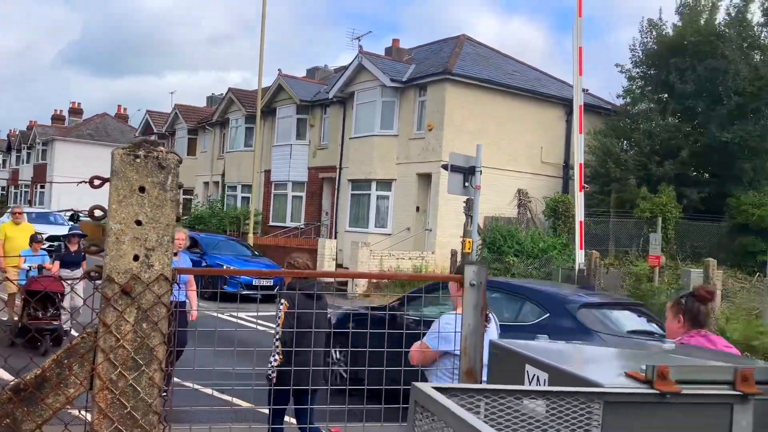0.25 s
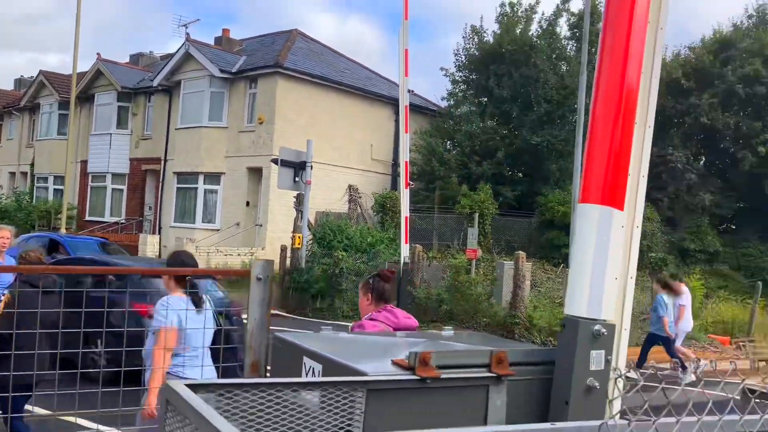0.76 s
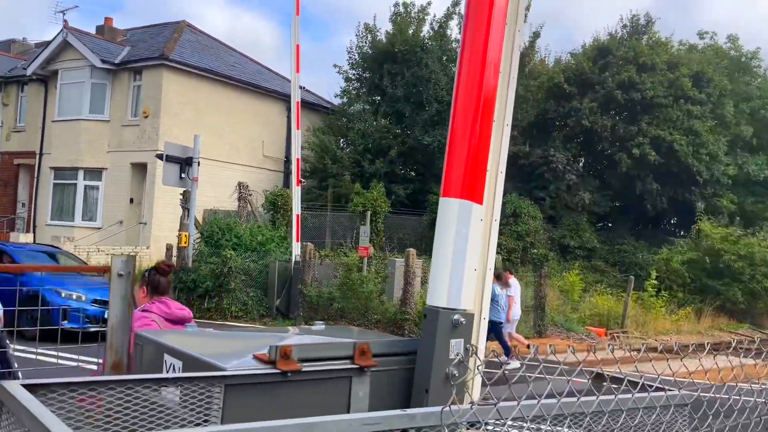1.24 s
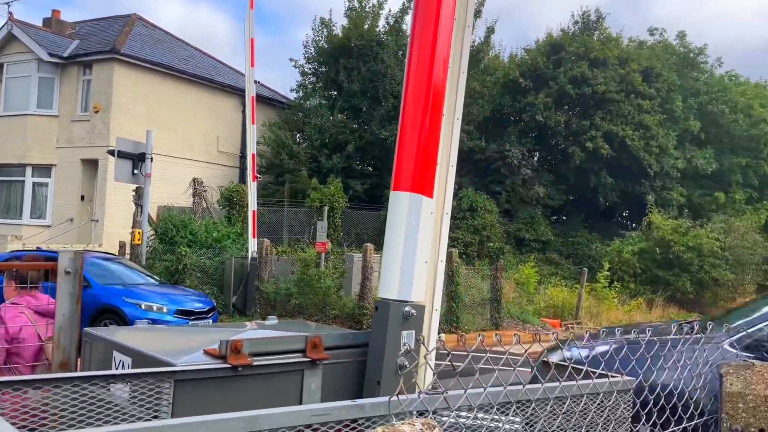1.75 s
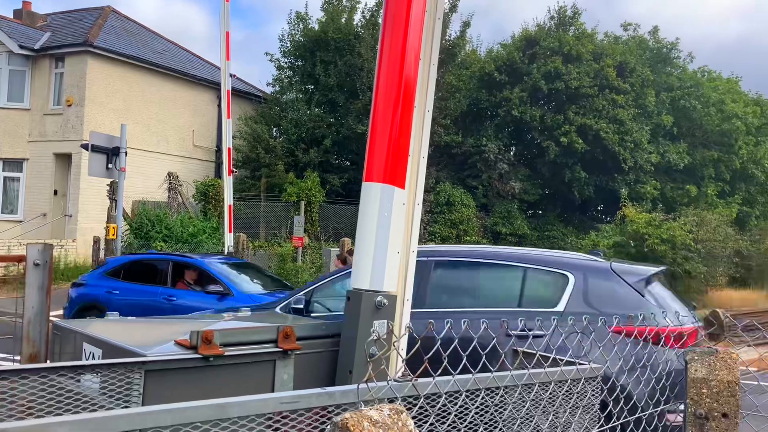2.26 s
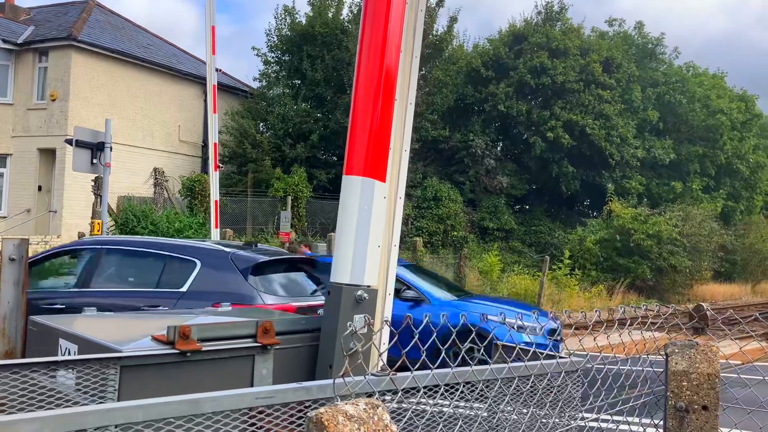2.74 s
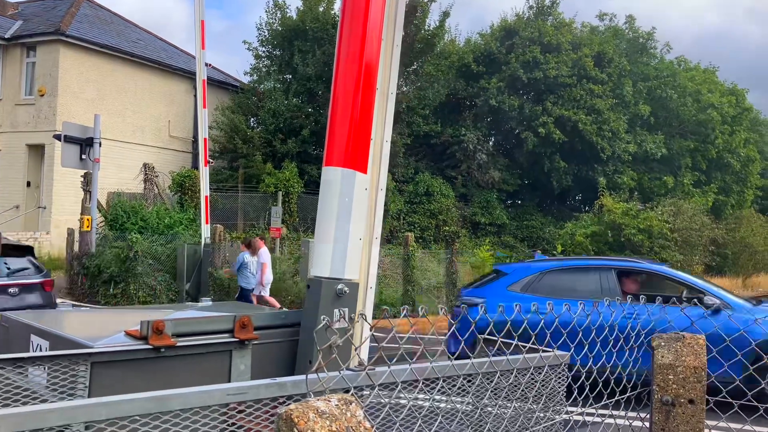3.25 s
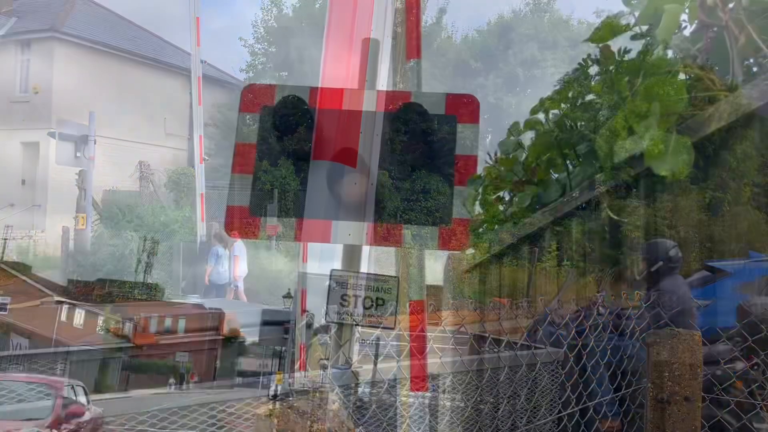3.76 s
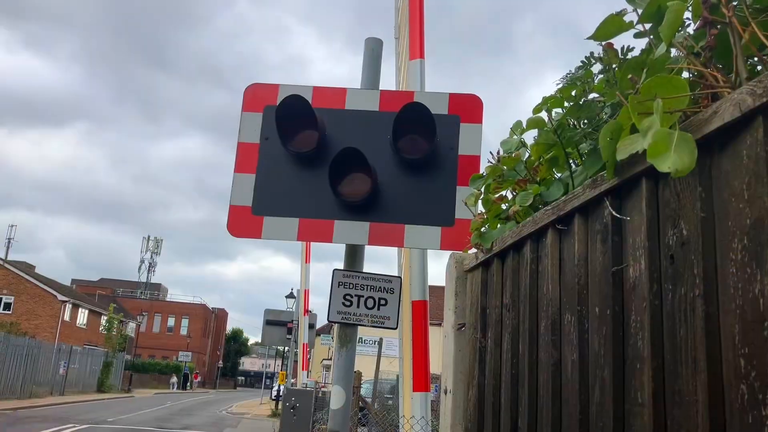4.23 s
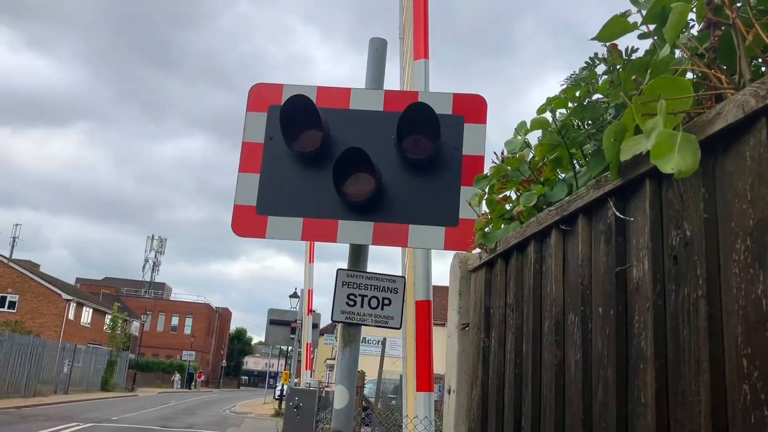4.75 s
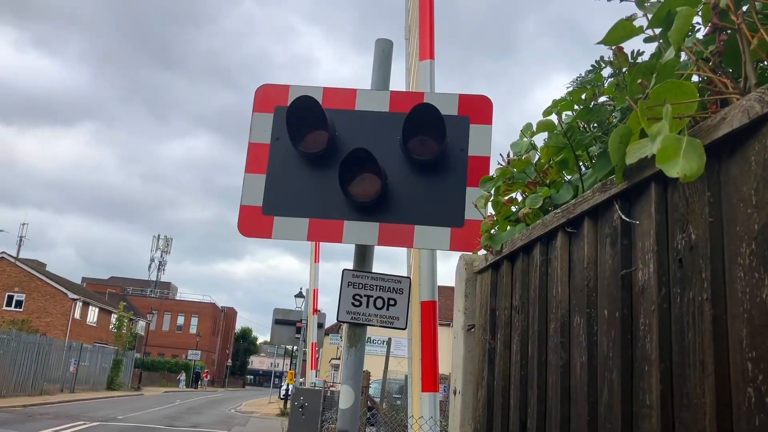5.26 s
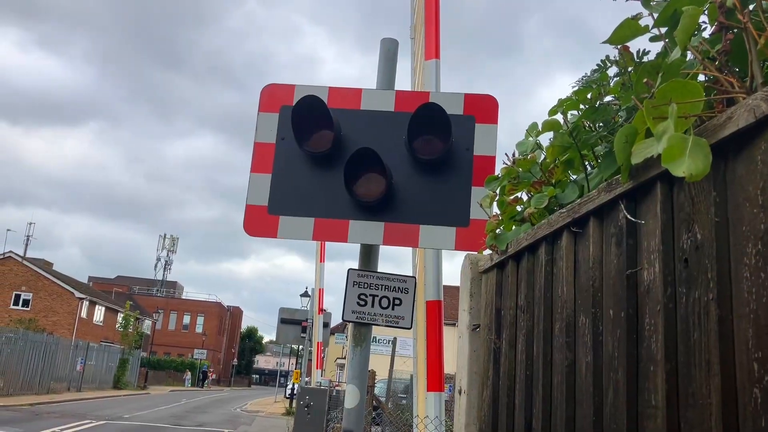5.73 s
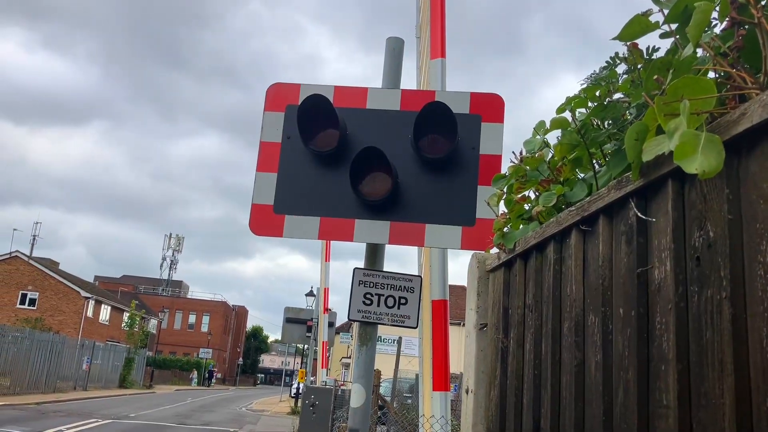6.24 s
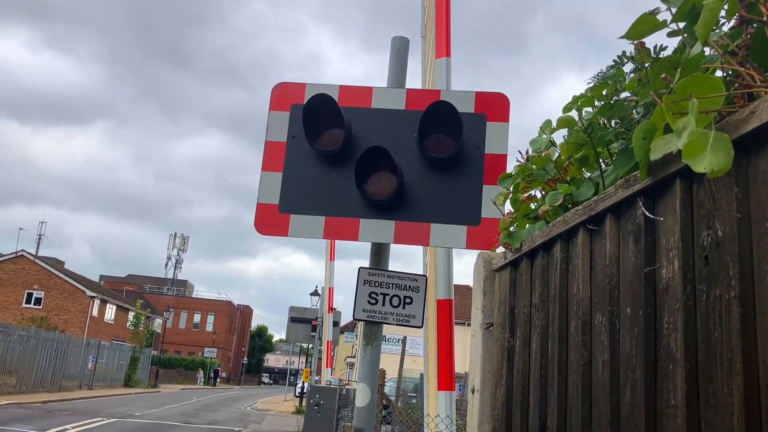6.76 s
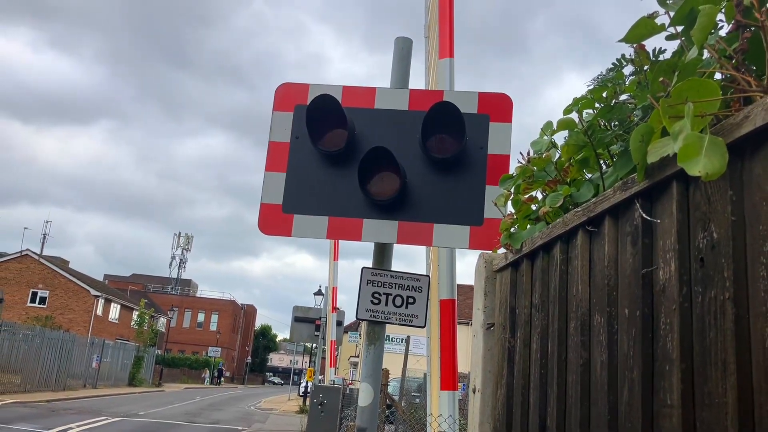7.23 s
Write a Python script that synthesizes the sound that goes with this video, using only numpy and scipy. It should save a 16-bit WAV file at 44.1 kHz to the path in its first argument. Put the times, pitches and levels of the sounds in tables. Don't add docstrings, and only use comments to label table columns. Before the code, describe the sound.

Outdoor stereo sound from two microphones close together. From 0 s, a fairly quiet, low traffic rumble: an engine coasts, its hum sinking until about 1 s, then pulling gently. A double tyre thump lands near 0.2 s, with faint very high brake chirps and small grit ticks. A second engine joins around 1.5 s; thumps come again near 2.1 s, bumps and chirps follow to 2.9 s, and a thin airy whistle grows towards 3.2 s. There the scene changes to a street: brighter tyre noise builds with slaps and crackling grit, and heavy thumps at 3.7 and 4.1 s. From 4.3 to 5.1 s a car passes very close, a broad roar with tread whine and exhaust note sliding down and a hollow boom off a fence. After 5.2 s it recedes through soft bumps, fading to dull distant traffic by 7.5 s.

```python
import sys
import numpy as np
from scipy import signal
from scipy.io import wavfile
from scipy.ndimage import uniform_filter1d

SR = 44100
rng = np.random.default_rng(int(sys.argv[2]) if len(sys.argv) > 2 else 0)


def rack_gain(trim_db):
    fader = np.asarray(trim_db, float)
    return 10 ** (fader / 20)


def store_wav(level_fs):
    pcm = np.round(np.clip(np.atleast_2d(level_fs), -1, 1) * 32767)
    wavfile.write(sys.argv[1], SR, pcm.T.astype(np.int16))


N = 330309

BAND_EDGES_HZ = (35, 200, 700, 2500, 8000)
SPREAD_DB = (4.64, 4.95, 12.23, 8.6)
# pitch_hz, level_db per Hz
QUEUE_COLOUR = [(18, -44), (30, -17), (45, -8.5), (76, -10.5), (177, -17), (214, -11), (484, -19),
                (680, -29.5), (960, -24), (1230, -34), (1880, -38.5), (2320, -49), (8000, -62),
                (10400, -80), (17600, -120)]
NEARING_COLOUR = [(18, -36), (30, 9), (63, 5.5), (235, -4), (290, -2.5), (325, -8), (520, -14),
                  (700, -20.5), (960, -8), (1320, -18), (1600, -15.5), (1970, -18.5), (2350, -26.5),
                  (3000, -31.5), (4570, -36.5), (8000, -41), (10400, -74), (17600, -120)]
PASSING_COLOUR = [(18, -30), (30, 4), (59, -6), (240, -4.5), (311, -12.5), (507, -12), (773, -11.5),
                  (1200, -7), (1490, -11), (2260, -16), (3970, -32.5), (5010, -32.5), (8000, -42.5),
                  (10400, -77), (17600, -120)]
LEAVING_COLOUR = [(18, -38), (30, -37), (44, -1), (114, -9), (158, -5.5), (318, -10), (544, -17),
                  (660, -22.5), (790, -19), (1000, -12), (1250, -13), (1790, -19), (2200, -26), (2550, -36),
                  (3300, -44.5), (4700, -50), (8000, -61)]
# pitch_hz, level_db against 7.5 kHz
QUEUE_AIR = [(10500, -6), (13000, -10), (16000, -15)]
PASSING_AIR = [(10500, -8), (13000, -11.5), (16000, -14)]
LEAVING_AIR = [(10500, -13), (13000, -19), (16000, -17)]
# level_db at nearness 0, then gain_db per dB of nearness
QUEUE_LAYERS = (-29, -37, -39.5, -51), (1.2, 1.8, 0, 0.9)
NEARING_LAYERS = (-27.5, -27, -38, -46.5), (-0.4, -0.32, 0.42, -.5)
PASSING_LAYERS = (-24, -29.5, -34.5, -43), (0.7, 2.2, 1.5, 0.96)
LEAVING_LAYERS = (-32.5, -34.5, -39, -53), (0.75, 0.82, 0.88, 1)
# time_s, nearness_db
QUEUE = [(0, 0.5), (.3, 1.5), (1.0, 0), (1.65, 0), (1.85, 0.5), (2.4, 2), (3.1, 4), (3.22, 2.5)]
NEARING = [(3.2, -7), (3.35, -6.5), (3.6, -2), (3.85, 2), (4.1, 2.5), (4.35, 8)]
PASSING = [(4.2, 0.5), (4.35, 1), (4.55, 0), (4.75, 0.5), (4.85, -1.5), (5.18, -3), (5.3, -7), (5.5, -3)]
LEAVING = [(5.15, 8), (5.35, 1.5), (5.6, 0), (5.9, -2), (6.1, -3), (6.5, -6), (7.05, -8.5), (7.49, -10)]
# start_s, end_s
HANDOVERS = [
    (3.22, 3.235),
    (4.23, 4.38),
    (5.12, 5.36),
]
# time_s, left_lag_samples, share of the sound (0-1)
SIDES = [(0, 15, 0.47), (.5, 14.5, 0.55), (1.75, 15, 0.4), (3.15, 12.5, 0.45), (3.5, 2, 0.09),
         (4.05, -9.5, 0.34), (5.1, -15.5, 0.33), (5.6, -18, 0.4), (7.49, -11.5, 0.31)]
# time_s, left_minus_right_db
LEAN = [(0, -0.5), (3.5, 1), (4.1, 0), (4.7, -0.1), (5.2, -1.5), (5.8, -1), (7.49, -1)]
# pitch_hz, left_minus_right_db
BASS_LEAN = [(60, 1), (140, -2.5), (280, -0.6), (1000, -0.5)]
# pitch_hz, then level_db on the left-right difference before and after the car
WIDENING = [(60, -4, -11), (130, 0, -6), (270, 2, 10), (600, 4, 6.5), (1150, -3, -2), (2110, 0.5, 2.5),
            (3500, -0.5, 0), (7000, -1, -0.5)]
# time_s, swing_db
THROB_DB = [(0, .5), (4.1, .5), (4.4, 2.5), (5.1, .4), (7.49, -0.3)]

# time_s, pitch_hz, level_db
FAR_CARS = [
    [(3.5, 72.5, -32), (3.65, 80, -29.5), (3.9, 97.7, -35)],
    [(5.9, 87.4, -45), (6.1, 95.3, -46), (6.3, 116.6, -43)],
]
# start_s, level_db (peak), pan_db, pitch_hz,
# decay_s
STRIKES = [(0.5694, -37, 0, 7540, 0.0028), (.5690, -43, 0, 12500, .004), (1.5873, -47, 1, 13480, .015),
           (1.742, -56, 0, 12020, 0.0036), (.3366, -44, 0, 11500, .006), (.8011, -47, 0, 11000, .004),
           (3.1762, -46, 0, 12000, .006), (3.8092, -48, 0, 12000, 0.0036), (.800, -40, -4, 6000, .003),
           (1.599, -42, 4, 9280, 0.0084), (2.41, -51, 0, 8850, 0.007), (2.463, -53, 0, 9380, 0.0071),
           (2.74, -46, -7, 10400, 0.0048), (2.79, -45, 0, 8420, 0.016), (3.301, -31.5, -8, 8150, 0.0022),
           (3.5345, -37, -6, 7500, 0.0035), (3.698, -35, -4, 4880, 0.0026), (3.710, -20, -2, 1550, 0.0038),
           (3.709, -32, -2, 4500, 0.0033), (3.739, -35, 0, 3800, 0.0018), (3.782, -36, 9, 7500, 0.0028),
           (3.81, -32.5, 13, 6500, 0.0029), (3.973, -28, 0, 4500, 0.0034), (3.987, -34, 4, 4500, .004),
           (4.023, -37, -10, 7000, .005), (4.060, -33, 0, 3980, .004), (4.304, -27, 9, 1400, 0.011),
           (4.378, -20, 11, 1670, .008), (4.658, -18, 7, 1480, 0.011), (5.036, -42, -1, 5900, 0.022),
           (2.77, -46, 0, 8000, 0.054), (3.785, -45, -3, 7940, .02),
           (.03, -33, 0, 1200, .012), (.33, -35, 4, 1150, .012), (.47, -33, 0, 1150, 0.011),
         (.73, -29.5, -3, 1200, 0.013), (3.242, -25, 0, 1250, 0.0078), (3.31, -23, 4, 1350, .008),
         (3.511, -27, 1, 1200, 0.0073), (3.649, -27, 7, 1210, 0.0096), (3.671, -32, 0, 1252, .008),
         (3.929, -28, 0, 1100, .008), (4.03, -25, 6, 1350, .015), (4.076, -31, 1, 1150, 0.014),
         (3.69, -30.5, -2, 1970, 0.017), (3.38, -31, 0, 2000, .015), (4.185, -24, 0, 1150, 0.011),
         (4.282, -29, 1, 1100, .01), (4.415, -26, 4, 1150, 0.011), (4.55, -29.5, -2, 3000, 0.017),
         (4.577, -26, 3, 1500, .01), (4.746, -16, 2, 1450, 0.011), (5.045, -23, -2, 1210, 0.011),
         (5.086, -28, -2, 1150, 0.0094), (5.375, -24, 0, 1150, .012)]
# start_s, level_db (peak), pitch_hz
CHIRPS = [(0.1101, -47.5, 11600), (0.3696, -54, 11500), (0.598, -52, 11600), (1.1623, -52, 11640),
          (1.4345, -48, 11600), (1.4805, -52, 11470), (1.7416, -44, 11570), (2.2987, -53, 11520),
          (2.3396, -45, 11580), (2.586, -40, 11600), (2.8245, -42, 11630), (2.913, -52, 11570)]
# start_s, level_db (peak), pitch_hz
THUMPS = [(0.2145, -20, 259), (0.2255, -12, 414), (.68, -20.5, 304), (1.55, -19, 258), (2.093, -12, 270),
          (2.139, -15, 202), (3.2298, -18, 294), (3.708, -10, 228), (4.064, -11.5, 286), (4.32, -18, 254),
          (4.382, -17, 326),
          (.109, -26, 229), (.375, -26, 230), (0.513, -23, 290), (.665, -21, 423), (.76, -21, 462),
         (.878, -19.5, 230), (4.482, -13, 149), (4.47, -24, 620), (4.61, -19, 497), (4.66, -19, 500),
         (4.765, -20, 180), (1.434, -24, 217), (1.67, -27, 170), (2.579, -15, 195), (2.696, -17, 215),
         (2.776, -15, 202), (2.992, -20, 180.5), (3.31, -19, 249), (3.418, -22, 230), (3.496, -21, 218),
         (3.981, -14, 171), (4.046, -16, 300), (4.072, -13, 260), (4.086, -14.5, 240), (4.188, -21, 250),
         (5.104, -18, 149), (5.15, -21, 175), (5.253, -13.5, 221), (5.35, -26, 183), (5.476, -16, 259),
         (5.507, -18.5, 250), (5.608, -17.5, 198), (5.771, -22, 250), (6.02, -25, 300), (6.274, -27, 215)]

# time_s, pitch_hz, level_db
BELT = [(0, 5900, -63), (.3, 5900, -71), (.55, 5900, -59), (.75, 5860, -64), (1.3, 5850, -78),
        (1.6, 5913, -80)]
# time_s, pitch_hz, level_db
TURBINE = [(2.6, 4200, -71), (2.8, 4300, -59), (3.0, 4430, -53.5), (3.25, 4500, -48), (3.4, 4300, -51),
           (3.6, 4300, -56), (3.75, 4200, -66)]
# time_s, pitch_hz, level_db
INTAKE = [(2.3, 3500, -62), (2.55, 3500, -58), (2.8, 3193, -52.5), (3.05, 3300, -52), (3.2, 3292, -58),
          (3.45, 3290, -53), (3.62, 3394, -55), (3.72, 3400, -68)]
# time_s, pitch_hz, level_db
PANELS = [(3.224, 1695, -59.5), (3.231, 1690, -37), (3.45, 1610, -40), (3.72, 1530, -40), (3.85, 1450, -58)]
# time_s, pitch_hz, level_db
ROAR = [(3.8, 992, -50), (3.98, 990, -32), (4.05, 950, -30), (4.2, 870, -34.5), (4.33, 910, -32.5),
        (4.45, 824, -36)]
# time_s, pitch_hz, level_db
BLOCKS = [(4.25, 2600, -60), (4.4, 2700, -54), (4.6, 2680, -43), (4.9, 2700, -42), (5.1, 2490, -64)]
# time_s, pitch_hz, level_db
SPRAY = [(4.15, 11500, -69), (4.35, 12000, -59), (4.55, 11500, -60), (4.75, 11000, -69), (5.2, 11000, -76),
         (5.4, 11000, -74), (5.9, 11000, -86)]
# time_s, pitch_hz, level_db
GROUND_ECHO = [(4.24, 2170, -64.5), (4.3, 1960, -30.5), (4.4, 1830, -44.5), (4.52, 1570, -32), (4.65, 1300, -29),
               (4.8, 1100, -42), (5.1, 960, -26.5), (5.4, 919, -43), (5.5, 900, -41)]
# time_s, pitch_hz, level_db
FENCE = [(4.4, 524, -42), (4.5, 494, -33), (4.8, 487, -31), (5, 427, -29), (5.2, 406, -39.5),
         (5.35, 373, -55)]
# time_s, pitch_hz, level_db
EXHAUST = [(4.3, 760, -71), (4.45, 635, -32.5), (4.7, 640, -37), (4.95, 515, -45), (5.1, 317, -51),
           (5.28, 237, -39), (5.5, 245, -36.5), (5.8, 230, -43.5), (6.05, 310, -40.5), (6.3, 332, -52)]

# time_s, pitch_hz (firing), level_db, load (0-1)
FIRST_CAR = [(0, 69.6, -26, 0), (.33, 66.43, -25, 0.02), (.55, 59.55, -25, 0.07), (.7, 53.73, -25.5, 0.1),
             (.85, 49.03, -25, 0.46), (1.02, 42.58, -25.5, 0.83), (1.3, 43.42, -29, 0.88),
             (1.6, 44.8, -29.5, 0.93), (1.95, 45.56, -30.5, 0.92), (2.05, 46.16, -38.5, .9),
             (2.15, 47, -27.5, 0.9), (2.45, 48.27, -26, 0.94), (3.1, 52.35, -32, 0.76),
             (3.45, 51.06, -30, 0.83), (3.85, 50.1, -33, 0.97)]
# time_s, pitch_hz, level_db
SECOND_CAR = [(1.399, 57.6, -40), (1.75, 59.35, -31), (1.85, 55, -39), (2.15, 55.9, -24.5),
              (2.24, 58.83, -34), (2.36, 64.2, -27), (2.53, 70.4, -34), (2.65, 67, -25), (2.76, 62, -32),
              (2.9, 62.9, -29), (3.03, 63, -27), (3.12, 67.1, -30), (3.25, 66.8, -28.5), (3.38, 59, -26),
              (3.48, 59, -33), (3.7, 55.6, -31), (3.8, 55.67, -44)]
# time_s, pitch_hz, level_db
STREET_CAR = [(4.5, 52.5, -38), (5.1, 51.9, -29), (5.18, 48.9, -40), (5.57, 52.4, -37), (5.96, 50.2, -62),
              (6.11, 52, -39.5), (6.65, 53.05, -42), (7.21, 53, -41), (7.49, 52.8, -34)]
# time_s, pitch_hz, level_db
PASSING_CAR = [(4.55, 104.6, -32), (4.67, 97, -56), (4.696, 96.6, -28), (4.818, 105.5, -43),
               (5.228, 98.1, -28), (5.294, 97, -49), (5.4, 102.3, -46)]
COASTING_DB = (0.5, -13.5, -30, -31)
PULLING_DB = (-8.5, 0.5, -11, -14.5)

# from_hz, to_hz
SUM_GAPS = [(8450, 9680), (12950, 14700), (15700, 23000)]
# from_hz, to_hz
DIFFERENCE_GAPS = [(7050, 7300), (10400, 12050), (14650, 23000)]
CLICKS_S = [.57, 1.745, 3.3, 3.785]
# start_s, end_s
TOP_DROPS_S = [(.27, .36), (.55, .6), (1.27, 1.32), (1.43, 1.47), (2.57, 2.71), (4.89, 4.94), (5.04, 5.09),
               (5.18, 5.22), (5.27, 5.42), (5.45, 7.6)]


def evened(x):
    return x / np.sqrt(np.mean(x ** 2) + 1e-20)


def read(points, hz):
    f, value = np.transpose(points)
    return np.interp(np.log(hz + 1), np.log(f + 1), value)


def follow(rows, t):
    s, *columns = np.transpose(rows)
    return np.array([np.interp(t, s, c) for c in columns])


def wander(size, smooth):
    drift = uniform_filter1d(rng.standard_normal(size), int(smooth))
    return evened(uniform_filter1d(drift, int(smooth)))


def resonate(x, hz, width):
    turn = np.exp(2j * np.pi * np.cumsum(hz * np.ones(len(x))) / SR)
    r = np.exp(-np.pi * width / SR)
    return 2 * (turn * signal.lfilter([1 - r], [1, -r], x / turn + 1e-18)).real


def add(mix, s, sound, lag=0, pan_db=0):
    for channel, sign in zip(mix, (1, -1)):
        start = max(round(s * SR + sign * lag / 2), 0)
        part = channel[start:][:len(sound)]
        part += rack_gain(sign * pan_db / 2) * sound[:len(part)]


def stage_power(nearness, layers, colour, air, hz, t):
    airy_db = read(colour, 7500) + read([(7500, 0)] + air, hz)
    colour_db = np.where(hz < 7500, read(colour, hz), airy_db)
    edges = np.array(BAND_EDGES_HZ)
    own_db = [10 * np.log10(np.sum(rack_gain(2 * colour_db[(hz >= a) & (hz < b)]))) for a, b in zip(edges, edges[1:])]
    base_db, gained = np.array(layers)
    change_db = gained[:, None] * follow(nearness, t) + (base_db + SPREAD_DB - own_db)[:, None]
    middles = np.sqrt(edges[1:] * edges[:-1])
    blend = np.array([read(list(zip(middles, one)), hz) for one in np.eye(4)])
    return rack_gain(2 * (colour_db[:, None] + blend.T @ change_db))


def road():
    frames, hz = N // 512 + 5, np.fft.rfftfreq(2048, 1 / SR)
    t = np.arange(frames) * 512 / SR
    second, third, fourth = (np.interp(t, span, (0, 1)) for span in HANDOVERS)
    power = (1 - second) * stage_power(QUEUE, QUEUE_LAYERS, QUEUE_COLOUR, QUEUE_AIR, hz, t)
    power += (second - third) * stage_power(NEARING, NEARING_LAYERS, NEARING_COLOUR, PASSING_AIR, hz, t)
    power += (third - fourth) * stage_power(PASSING, PASSING_LAYERS, PASSING_COLOUR, PASSING_AIR, hz, t)
    power += fourth * stage_power(LEAVING, LEAVING_LAYERS, LEAVING_COLOUR, LEAVING_AIR, hz, t)

    draws = rng.standard_normal((frames, len(hz), 9)).T
    near, far, wide, apart = draws[0:8:2] + 1j * draws[1:8:2]
    patches = evened(uniform_filter1d(uniform_filter1d(draws[-1], 6, 0), 3, 1))

    near_lag, near_share = follow(SIDES, t)
    far_lag, far_share = -1.36 * near_lag, 0.23
    scatter_hz = 4500
    aimed = 1 / (1 + (hz[:, None] / scatter_hz) ** 2)
    near_share = aimed * np.clip(near_share, 0, .6)
    far_share = aimed * np.clip(far_share, 0, .4)

    mic_gap_m, sound_speed = 0.17, 343
    alike = np.sinc(2 * hz * mic_gap_m / sound_speed)[:, None]
    diffuse = np.array([wide, alike * wide + np.sqrt(1 - alike ** 2) * apart])
    sign = np.array([1, -1])[:, None, None]
    half_turn = -1j * np.pi * hz[:, None] / SR * sign
    z = np.sqrt(near_share) * near * np.exp(half_turn * near_lag)
    z = z + np.sqrt(far_share) * far * np.exp(half_turn * far_lag)
    z = z + np.sqrt(1 - near_share - far_share + 1e-9) * diffuse

    wide_hz, here_db, street_db = np.transpose(WIDENING)
    wider_db = np.outer(read(np.c_[wide_hz, here_db], hz), 1 - third)
    wider_db += np.outer(read(np.c_[wide_hz, street_db], hz), third)
    z = z.mean(0) + sign * rack_gain(wider_db) * (z[0] - z[1]) / 2

    throb_db = follow(THROB_DB, t) * wander(frames, 3.3)
    lean_db = read(BASS_LEAN, hz)[:, None] + follow(LEAN, t)
    uneven_db = np.clip(hz / 800, 0, 1)[:, None] * (1.75 * patches + throb_db)
    z *= np.sqrt(power) * rack_gain(uneven_db + sign * lean_db / 2)
    return .61 * signal.istft(z, nperseg=2048, noverlap=1536)[1][:, :N]


def tick(db, hz, decay_s):
    t = np.arange(3000) / SR
    band = signal.butter(2, (0.63 * hz, 1.1 * hz), "band", fs=SR, output="sos")
    crack = evened(signal.sosfilt(band, rng.standard_normal(len(t))))
    return rack_gain(db) * 0.73 * crack * (np.exp(-t / decay_s) + 0.068 * np.exp(-t / 0.012))


def chirp(db, hz, t60=0.051):
    t = np.arange(3000) / SR
    rise = 1 - np.exp(-t / 0.00064)
    release = 1 + np.exp((t - .021) / .002)
    grip = rise * rack_gain(-60 * t / t60) / release
    return rack_gain(db + 1.7 * wander(len(t), 60)) * grip * np.sin(2 * np.pi * hz * t)


def thump(db, hz, cycles=1.07):
    t = np.arange(3000) / SR
    ring = np.sin(2 * np.pi * hz * t) * np.exp(-t * hz / cycles) * (1 - np.exp(-t * hz * 3.4))
    knock = np.sin(2 * np.pi * 110 * t) * np.exp(-t / 0.022)
    return rack_gain(db) * (1.23 * ring + 0.23 * knock)


def whistle(rows, width):
    t = np.arange(rows[0][0], rows[-1][0], 1 / SR)
    hz, db = follow(rows, t)
    narrow = resonate(resonate(rng.standard_normal(len(t)), hz, width), hz, width)
    return rows[0][0], rack_gain(db + 1.47 * wander(len(t), 900)) * evened(narrow)


def loaded(rows):
    s, hz, db, load = np.transpose(rows)
    orders_db = db[:, None] + np.outer(1 - load, COASTING_DB) + np.outer(load, PULLING_DB)
    return np.c_[s, hz, orders_db]


def engine(rows, unsteady_db=-4.5, waver=0.0018):
    t = np.arange(rows[0][0], rows[-1][0], 1 / SR)
    hz, *orders_db = follow(rows, t)
    turns = np.cumsum(hz * (1 + waver * wander(len(t), 4100))) / SR
    hum = np.zeros(len(t))
    for k, db in enumerate(orders_db, 1):
        strength = rack_gain(db + unsteady_db * wander(len(t), 2000))
        hum += strength * np.cos(2 * np.pi * (k * turns + rng.random()))
    return rows[0][0], np.sqrt(2) * hum * signal.windows.tukey(len(t), .03)


def scene():
    mix = road()
    for rows in FAR_CARS:
        add(mix, *engine(rows), lag=-13.0)
    for s, db, pan_db, hz, decay_s in STRIKES:
        add(mix, s, tick(db, hz, decay_s), lag=follow(SIDES, s)[0], pan_db=pan_db)
    for s, db, hz in CHIRPS:
        add(mix, s, chirp(db, hz))
    for s, db, hz in THUMPS:
        add(mix, s, thump(db, hz), lag=.5 * follow(SIDES, s)[0])
    add(mix, *whistle(BELT, width=160), lag=13)
    add(mix, *whistle(TURBINE, width=810), lag=10.5)
    add(mix, *whistle(INTAKE, width=710), lag=11)
    add(mix, *whistle(PANELS, width=780), lag=7.5)
    add(mix, *whistle(ROAR, width=330), lag=-2.0)
    add(mix, *whistle(BLOCKS, width=880), lag=-14.0)
    add(mix, *whistle(SPRAY, width=5700), lag=-11)
    add(mix, *whistle(GROUND_ECHO, width=270), lag=-15.0)
    add(mix, *whistle(FENCE, width=270), lag=-14, pan_db=9.5)
    add(mix, *whistle(EXHAUST, width=155), lag=-5, pan_db=-5)
    add(mix, *engine(loaded(FIRST_CAR), unsteady_db=1.5, waver=0.003), lag=13, pan_db=-2.5)
    second_car = [(*row, row[2] - 11.5) for row in SECOND_CAR]
    add(mix, *engine(second_car, unsteady_db=1.0), lag=-8, pan_db=-1.0)
    add(mix, *engine(STREET_CAR, unsteady_db=2.0, waver=0.023), lag=-6, pan_db=-1.5)
    add(mix, *engine(PASSING_CAR, unsteady_db=0.5), lag=-11, pan_db=-2.5)
    return mix


def thinned(x, gaps, alone, flicker_hz, weak=0.33, weak_treble=0.71):
    block, block_start = 1024, 831
    n, k = np.arange(2 * block), np.arange(block) + .5
    window = np.sin(np.pi * (n + .5) / (2 * block))
    basis = window[:, None] * np.cos(np.pi / block * np.outer(n + .5 + block / 2, k))
    lead, blocks = 2 * block - block_start, N // block + 4
    halves = np.pad(x, (lead, blocks * block - lead - N)).reshape(blocks, block)
    lines = np.hstack([halves[:-1], halves[1:]]) @ basis
    hz = k * SR / (2 * block)
    t = ((np.arange(blocks - 1) + 1) * block - lead) / SR

    edges = np.array(gaps) + flicker_hz * np.round(rng.standard_normal((len(t), len(gaps), 2)))
    empty = ((hz > edges[..., :1]) & (hz < edges[..., 1:])).any(1)
    dropped = sum((t > a) & (t < b) for a, b in TOP_DROPS_S).astype(bool)
    empty |= dropped[:, None] & (hz > 13500)
    empty |= hz > 15800
    least = np.interp(hz, (1000, 3000, 6500, 9000), (0, weak, 0.7 * weak, weak_treble))
    empty |= abs(lines) < least * uniform_filter1d(abs(lines), size=32, axis=1)

    click = (abs(t[:, None] - CLICKS_S) < .012).any(1)[:, None]
    click = click & (hz < np.where(t < 2, 14800, 13300)[:, None])
    alone = np.array(alone)
    alone_db = 3.5 * ((hz > alone[:, :1]) & (hz < alone[:, 1:])).any(0)
    back = (rack_gain(alone_db) * lines * (click | ~empty)) @ basis.T * 2 / block
    joined = np.pad(back[:, :block], ((0, 1), (0, 0))) + np.pad(back[:, block:], ((1, 0), (0, 0)))
    return joined.ravel()[lead:lead + N]


def top_cut(x):
    return signal.sosfilt(signal.butter(12, 16810, fs=SR, output="sos"), x)


def record(dry):
    dry = signal.sosfilt(signal.butter(6, 42, "high", fs=SR, output="sos"), dry)
    both = thinned((dry[0] + dry[1]) / 2, SUM_GAPS, DIFFERENCE_GAPS, flicker_hz=195)
    apart = thinned((dry[0] - dry[1]) / 2, DIFFERENCE_GAPS, SUM_GAPS, flicker_hz=230)
    return top_cut(np.array([both + apart, both - apart]))


dry = scene()
out = record(dry)
store_wav(out)
```